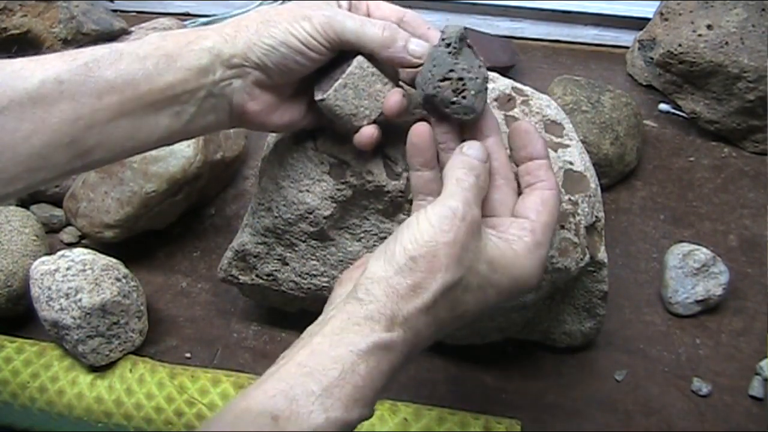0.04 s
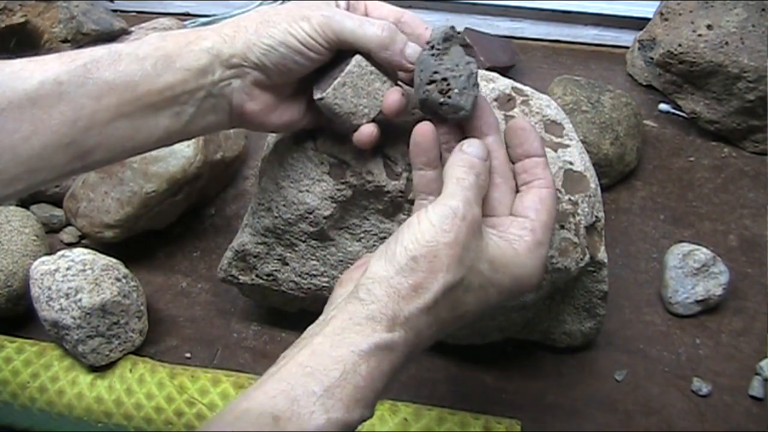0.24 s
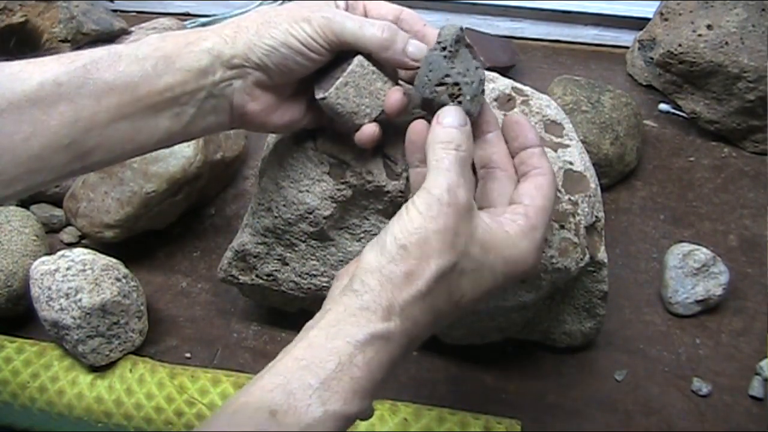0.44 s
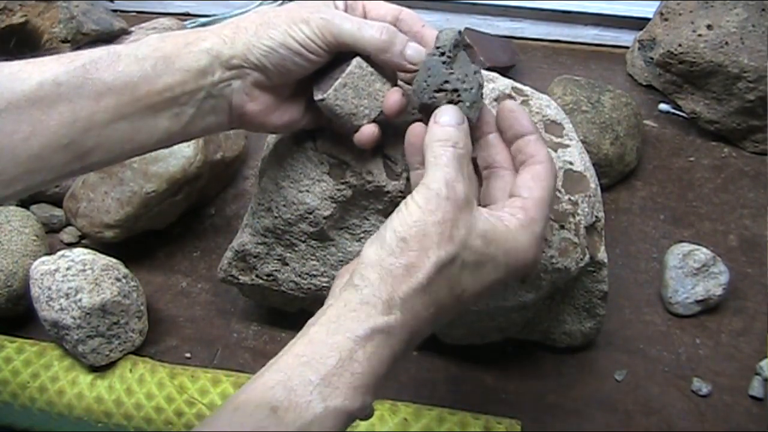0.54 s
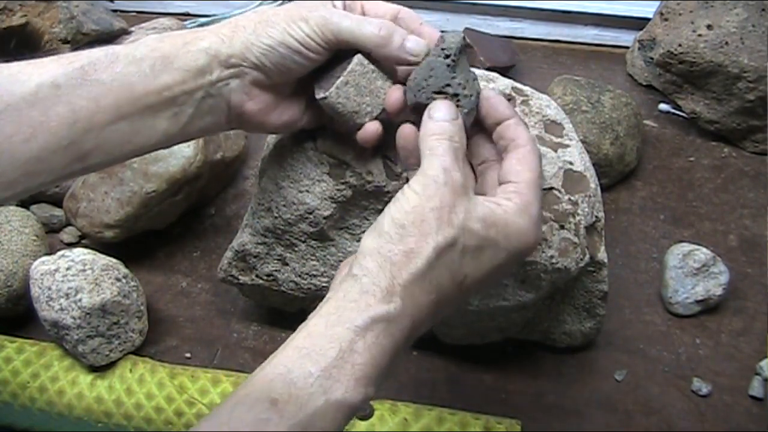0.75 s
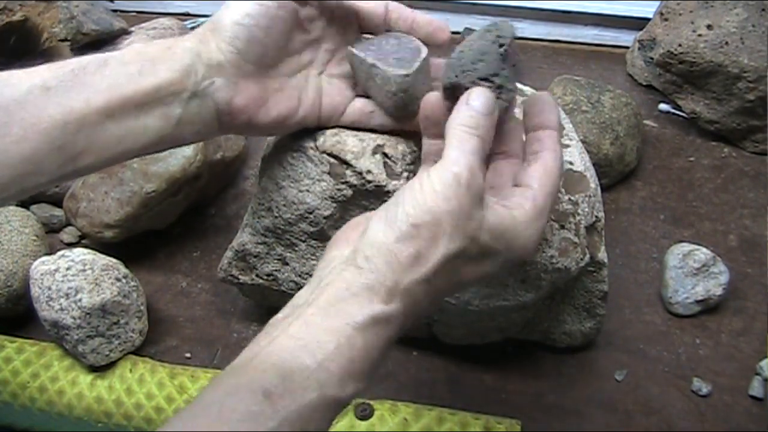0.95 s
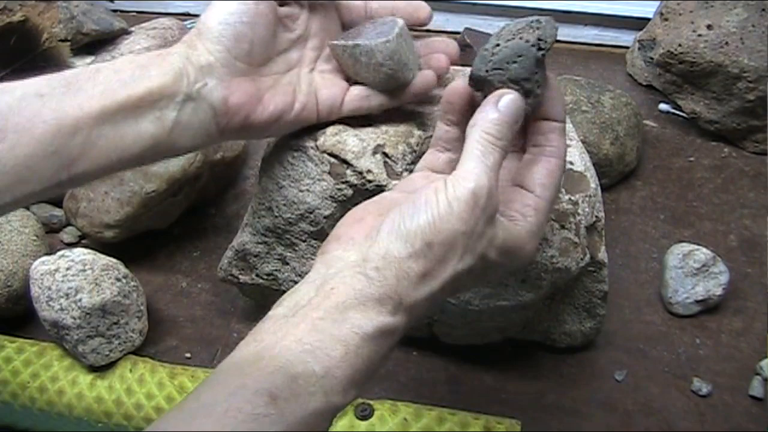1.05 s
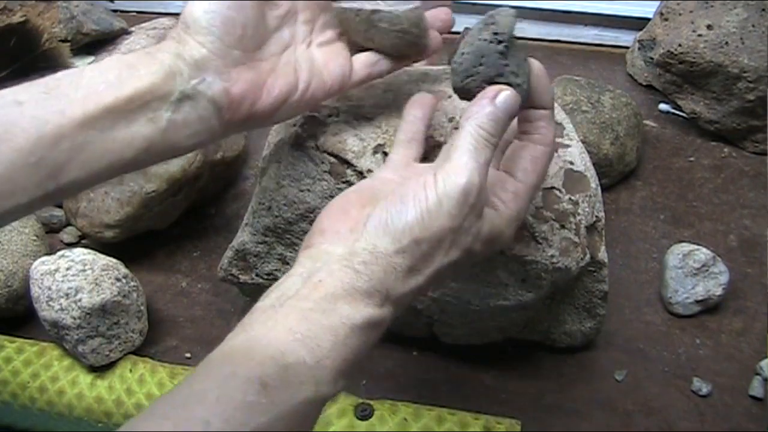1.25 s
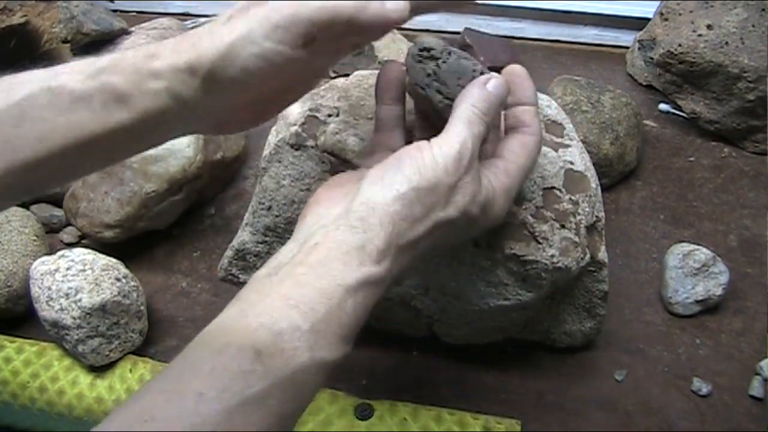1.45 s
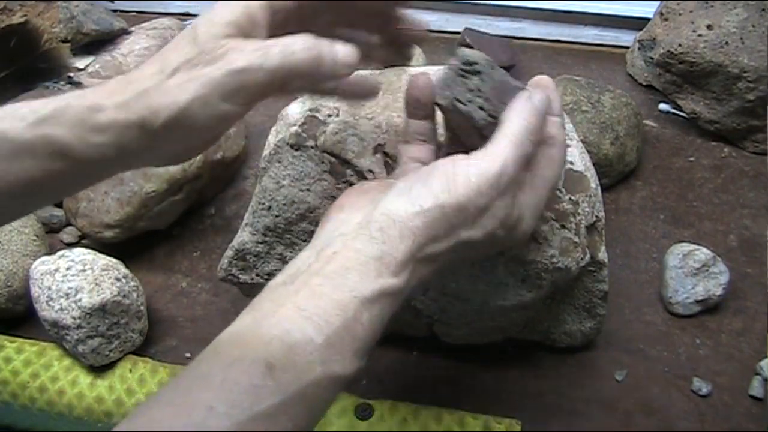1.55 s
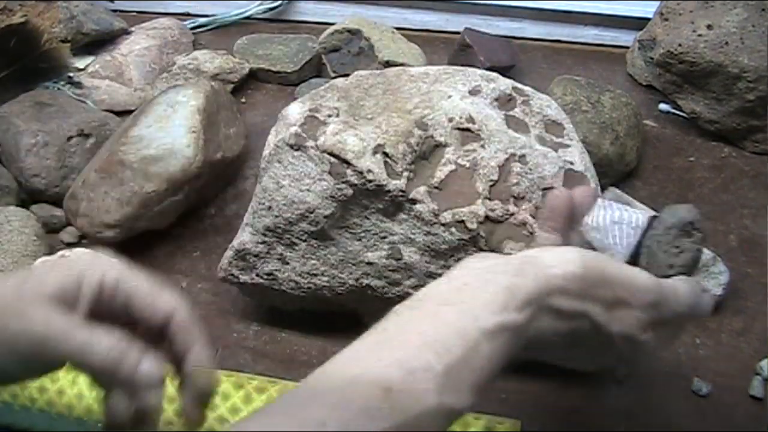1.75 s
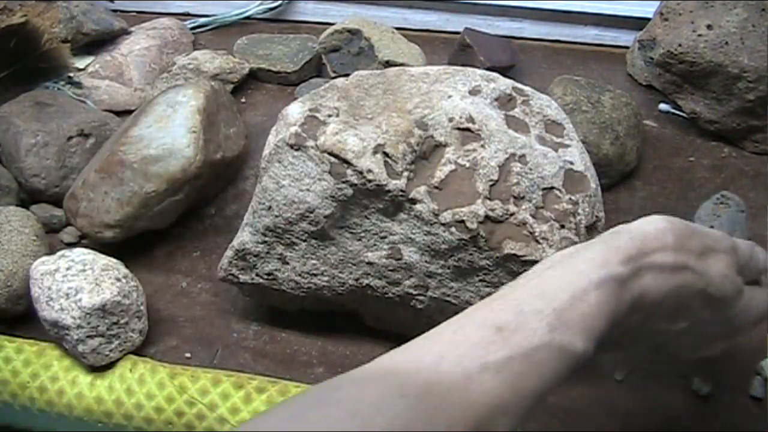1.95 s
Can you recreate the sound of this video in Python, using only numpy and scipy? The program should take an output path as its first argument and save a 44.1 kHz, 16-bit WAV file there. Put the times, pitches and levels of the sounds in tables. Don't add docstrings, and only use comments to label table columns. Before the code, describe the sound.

Dry, hard clicks of hand-held stones knocking in a quick burst, then softer taps on a table

```python
import sys
import numpy as np
from scipy import signal
from scipy.io import wavfile
from scipy.ndimage import uniform_filter1d

SR = 44100
rng = np.random.default_rng(int(sys.argv[2]) if len(sys.argv) > 2 else 0)


def level_to_linear(level):
    exponent = np.asarray(level, float) / 20
    return 10 ** exponent


def generate_wav(sig):
    pcm = np.round(np.clip(np.atleast_2d(sig).T, -1, 1) * 32767).astype(np.int16)
    wavfile.write(sys.argv[1], SR, pcm)


N = 88376


def evened(x):
    return x / np.sqrt(np.mean(x ** 2) + 1e-20)


def read(points, hz):
    f, value = np.transpose(points)
    return np.interp(np.log(hz + 1), np.log(f + 1), value)


def add(mix, start_s, sound):
    part = mix[..., round(start_s * SR):][..., :sound.shape[-1]]
    part += sound[..., :part.shape[-1]]


def band(x, n, hz, kind):
    return signal.sosfilt(signal.butter(N=n, Wn=hz, btype=kind, fs=SR, output="sos"), x)


def resonate(x, hz, width_hz):
    turn = np.exp(2j * np.pi * hz * np.arange(x.shape[-1]) / SR)
    r = np.exp(-np.pi * width_hz / SR)
    return 2 * (turn * signal.lfilter([1 - r], [1, -r], x / turn)).real


# f/Hz, density/dB
RUMBLE_SPECTRUM = [(15, -61), (25, -13), (49, -4.5), (71, -22.5), (108, -6), (210, -9), (274, -2.5),
                   (309, -6.5), (600, -13.5), (780, -69), (1320, -120)]
# f/Hz, density/dB
HISS_SPECTRUM = [(350, -62), (600, -7.5), (957, -5.5), (1040, -4.5), (1230, -11), (1530, -9.5),
                 (2150, -14.5), (6920, -28.5), (16000, -40.5)]
# f/Hz, correlation
EAR_LIKENESS = [(60, 0.83), (130, 0.71), (290, 0.9), (640, 0.46), (1410, 0.58), (3100, -0.52),
                (6820, -0.63), (15000, -0.93)]


def air(spectrum, level_db, patchy_db):
    frames, hz = N // 512 + 5, np.fft.rfftfreq(2048, 1 / SR)
    a, b, c, d, patches = rng.standard_normal((frames, 1025, 5)).T
    patches = uniform_filter1d(patches, size=16, axis=0)
    patches = evened(uniform_filter1d(patches, size=8, axis=1))
    same = np.clip(read(EAR_LIKENESS, hz), -1, 1)[:, None]
    left = a + 1j * b
    right = same * left + np.sqrt(1 - same ** 2) * (c + 1j * d)
    z = np.array([left, right])
    z *= level_to_linear(read(spectrum, hz)[:, None] + patchy_db * patches)
    noise = signal.istft(z, nperseg=2048, noverlap=1536)[1][:, :N]
    return level_to_linear(level_db) * evened(noise)


# f/Hz, width/Hz, level/dB
FAN_TONES = [(40, 5.2, -76), (238.4, 9.2, -57), (272.7, 18.3, -51.5), (394.5, 57, -54), (6940, 1000, -75.5)]


def fan_hum():
    out = np.zeros(N)
    for hz, width_hz, db in FAN_TONES:
        out += level_to_linear(db) * evened(resonate(rng.standard_normal(N), hz, width_hz))
    return out


def contact(width_us, grit_db, grit_top_hz):
    turn = 1.71
    t = np.arange(-88, 300) / SR
    u = t / (width_us * 1e-6)
    swing = (np.cos(turn * u) - np.exp(-turn ** 2 / 2)) * np.exp(-u ** 2 / 2)
    blow = band(swing, 7, 4590, "low")
    blow = np.roll(blow, 88 - np.argmax(blow)) / blow.max()
    grit_t60_s, spark_db = 0.001, -27
    noise = rng.standard_normal(len(t)) * (t > -2e-4) * level_to_linear(-60 * np.maximum(t, 0) / grit_t60_s)
    grit = band(noise, 3, [4690, grit_top_hz], "band")
    grit = grit / abs(grit).max() + level_to_linear(spark_db) * noise
    click = (blow + level_to_linear(grit_db) * grit)[44:]
    return click / abs(click).max()


# f/Hz, t60/s
ROOM_DECAY = [(700, 0.16), (1500, 0.19), (2600, 0.12), (4500, 0.15), (7000, 0.3), (12000, 0.082)]


def room_tail():
    taps = np.zeros((3, SR // 2))
    at = np.arange(40, SR // 2 - 12, 12)
    at = at + rng.integers(0, 12, (3, len(at)))
    np.put_along_axis(taps, at, np.sign(rng.standard_normal(at.shape)), 1)
    same = 0.79
    taps = np.sqrt(same) * taps[0] + np.sqrt(1 - same) * taps[1:]
    hz, t, z = signal.stft(taps, SR, nperseg=64)
    walls = level_to_linear(-60 * t / read(ROOM_DECAY, hz)[:, None])
    first = level_to_linear(7.5 - 60 * t / 0.021)
    late = level_to_linear(-10 - 60 * t / 0.37)
    tail = signal.istft(z * (walls + first + late), SR, nperseg=64)[1]
    tail = band(tail, 3, 1050, "high")
    return tail / np.linalg.norm(tail[0])


# t/s, peak level/dB
CLATTERS = [
    [(1.3718, -1), (1.3743, -15)],
    [(1.3840, -2)],
    [(1.3926, -11), (1.3992, -15)],
    [(1.4163, -16), (1.4168, -11)],
    [(1.4268, -1)],
    [(1.4361, -23)],
    [(1.4444, -10), (1.4467, -22), (1.4491, -11)],
    [(1.4639, -27), (1.4652, -30)],
    [(1.4703, -18), (1.4727, -15), (1.4746, -20), (1.4760, -22)],
    [(1.4946, -5), (1.4978, -8)],
    [(1.4996, -17), (1.5009, -18), (1.5065, -24)],
    [(1.6155, -26), (1.6171, -31), (1.6225, -30)],
    [(1.7105, -26), (1.7129, -23), (1.7164, -28)],
    [(1.7289, -17)],
    [(1.7325, -20), (1.7339, -26)],
    [(1.8439, -24), (1.8448, -32)],
    [(1.8857, -14)],
    [(1.8887, -10), (1.8907, -18), (1.8993, -25)],
    [(1.9648, -28), (1.9665, -31)],
    [(.7045, -43)],
    [(.9825, -40)],
    [(1.0265, -47)],
]
# contact/us, room level/dB, grit level/dB, grit top f/Hz, pan/dB
TOUCHES = [(128, -7, -19.5, 7950, 0), (100, -11.5, -23, 7500, -2), (115, -16, -36, 9400, 3),
           (109, -8, -30, 9300, -2), (90, -10, -17, 6800, 0), (125, 5.5, -27, 6700, -2),
           (102, -11.5, -27, 5600, -1.5), (90, -17, 1.5, 9800, -4), (117, -4.5, -31, 8300, -.5),
           (88, -12.5, -13.5, 6550, -0.5), (113, -6.5, -33, 4700, -.5), (151, -2, -30, 7000, -0.5),
           (137, 0, -30, 7300, -.5), (122, -5.5, -16, 7300, -1.5), (115, 0.5, -25, 6560, -.5),
           (90, -11.5, 4, 8860, -1), (111, -0.5, -23, 7900, -0.5), (98.5, -1.5, -29, 8600, -1.5),
           (140, 2.5, -30, 7000, -.5), (91, -5, -3, 9500, -4), (148, -6, -9, 6300, 0),
           (108, 7.5, -20, 5400, .5)]


def knocks():
    level_db = 0.48
    bounce_ms, bounce_db = (.52, .57), (-11, -12.5)
    out = np.zeros((2, N))
    tails = [room_tail() for _ in range(5)]
    for k, (hits, touch) in enumerate(zip(CLATTERS, TOUCHES)):
        width_us, room_db, grit_db, grit_top_hz, pan_db = touch
        pan = pan_db / 2 * np.array([[1], [-1]])
        for j, (peak_s, peak_db) in enumerate(hits):
            click = level_to_linear(peak_db + level_db) * contact(width_us, grit_db, grit_top_hz)
            start_s = peak_s - 44 / SR
            add(out, start_s, click * level_to_linear(pan))
            for ear in (0, 1):
                add(out[ear], start_s + bounce_ms[ear] / 1000, level_to_linear(bounce_db[ear]) * click)
            wet = signal.fftconvolve(click[None], tails[(k + j) % 5], axes=1)
            add(out, start_s, level_to_linear(room_db + pan) * wet)
    return out


# t/s, length/s, level/dB, centre f/Hz
SKIN_RUBS = [
    (0.9, 0.052, -66, 8000),
    (1.033, 0.11, -67.5, 8000),
    (1.676, 0.057, -61.5, 7160),
    (1.761, 0.06, -61, 8100),
]


def rubs():
    out = np.zeros((2, N))
    for start_s, length_s, db, hz in SKIN_RUBS:
        n = int(length_s * SR)
        noise = rng.standard_normal((3, n))
        hiss = noise[0] + .5 * noise[1:]
        for _ in range(2):
            hiss = resonate(hiss, hz, 3400)
        add(out, start_s, level_to_linear(db) * np.hanning(n) * evened(hiss))
    return out


# centre t/s, level/dB
INSECT_CHIRPS = [
    (1.06, -70),
    (1.091, -63),
    (1.125, -64),
    (1.162, -63),
    (1.21, -62.5),
    (1.245, -63),
    (1.279, -61.5),
    (1.31, -67),
]


def insect():
    chirp_hz, half_s = 4230, 0.0082
    out, t = np.zeros(N), np.arange(-half_s, half_s, 1 / SR)
    for centre_s, db in INSECT_CHIRPS:
        hz = chirp_hz * rng.uniform(.99, 1.01)
        add(out, centre_s - half_s, level_to_linear(db) * np.hanning(len(t)) * np.sin(2 * np.pi * hz * t))
    return out


# f/Hz, level/dB, t60/s
TABLE_MODES = [(1492, -5, 0.047), (1747, -3, 0.052), (2040, -15.5, 0.14), (2570, -11, 0.17),
               (2885, -1, 0.053), (3080, 0.5, .025), (3163, -10, 0.055), (3517, -10, 0.096),
               (4000, -19, 0.11), (4580, -15.5, 0.048)]
# t/s, level/dB
STONES_DOWN = [
    (1.6155, -41),
    (1.7129, -60),
    (1.7325, -45),
    (1.8857, -38),
    (1.8876, -27),
    (1.9648, -43),
]


def table_ring():
    wake_s = .002
    out, t = np.zeros(N), np.arange(SR // 5) / SR
    wake = np.sin(np.pi / 2 * np.minimum(t / wake_s, 1)) ** 2
    for start_s, db in STONES_DOWN:
        ring = np.zeros(len(t))
        for hz, mode_db, t60_s in TABLE_MODES:
            share_db = 2 * rng.standard_normal()
            fall_db = -60 * t / np.clip(t60_s, .01, .15)
            ring += level_to_linear(db + share_db + mode_db + fall_db) * np.sin(2 * np.pi * hz * t)
        add(out, start_s, wake * ring)
    return out * level_to_linear([[-1], [1]])


def scene():
    floor = air(RUMBLE_SPECTRUM, -48.5, 2.1) + air(HISS_SPECTRUM, -54, 1.0) + fan_hum()
    return floor + knocks() + rubs() + insect() + table_ring()


def roll_off(x):
    return signal.sosfilt(signal.butter(12, 16460, fs=SR, output="sos"), x)


def record(dry):
    sos = signal.butter(N=4, Wn=[32, 15600], btype="band", fs=SR, output="sos")
    mix = np.clip(signal.sosfiltfilt(sos, dry), -.95, .95)
    return roll_off(mix)


dry = scene()
out = record(dry)
generate_wav(out)
```